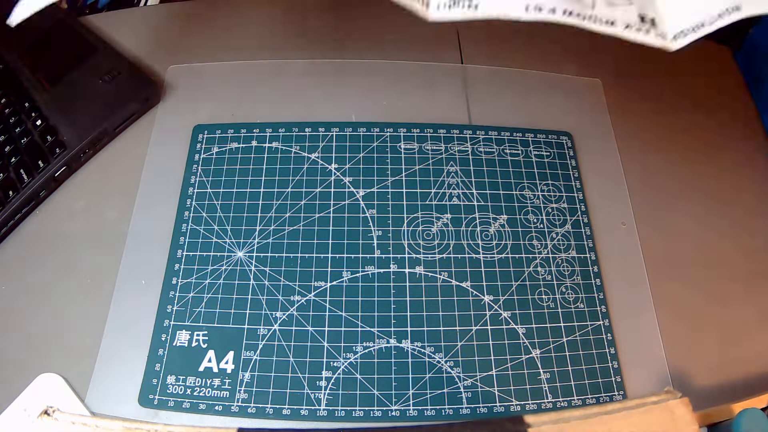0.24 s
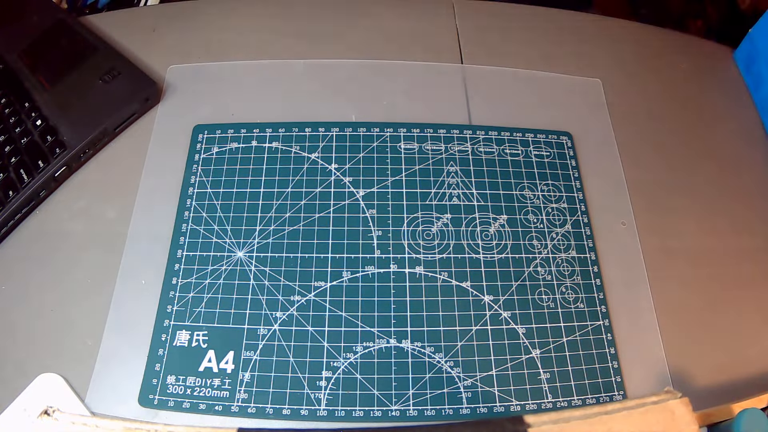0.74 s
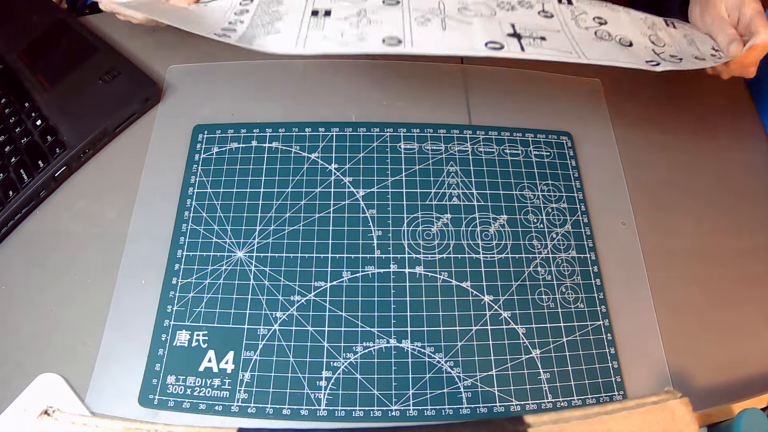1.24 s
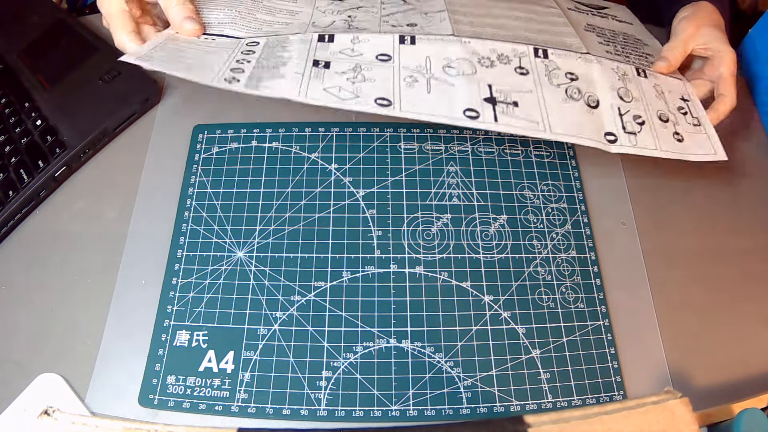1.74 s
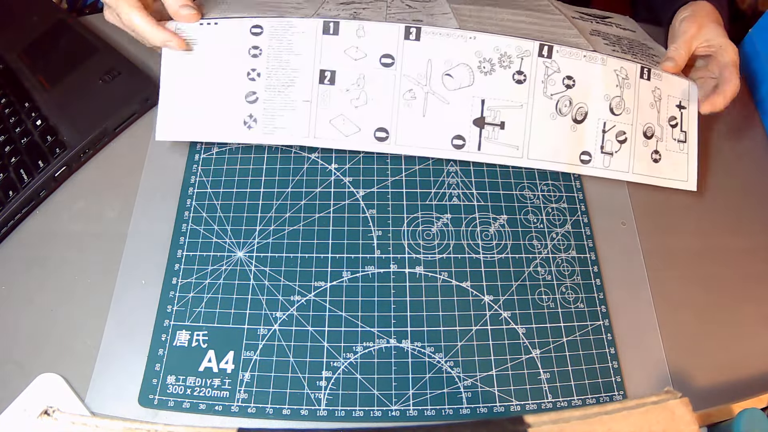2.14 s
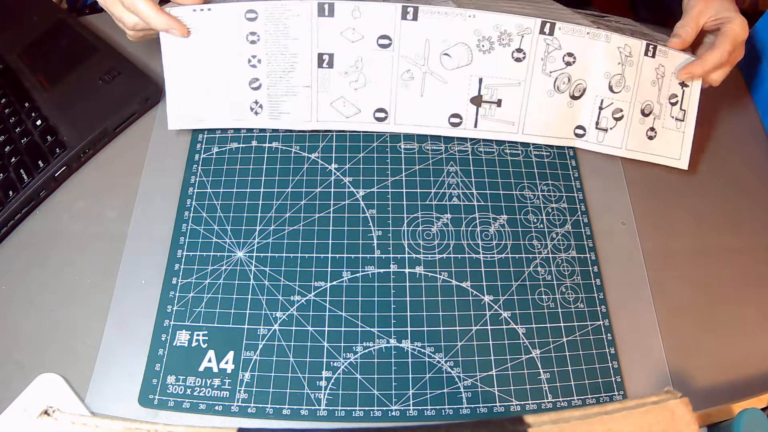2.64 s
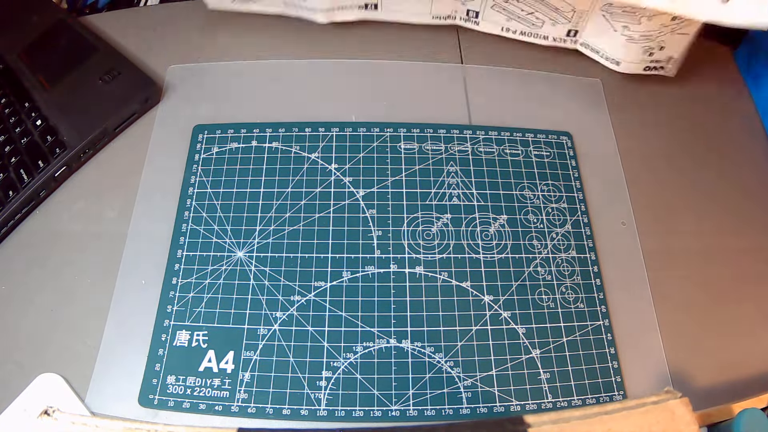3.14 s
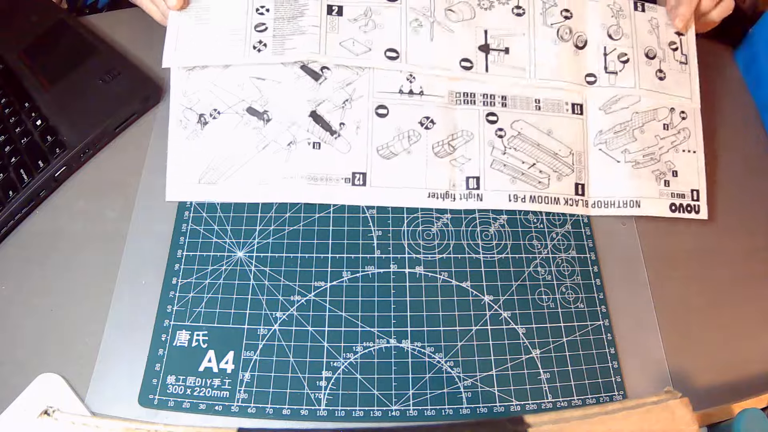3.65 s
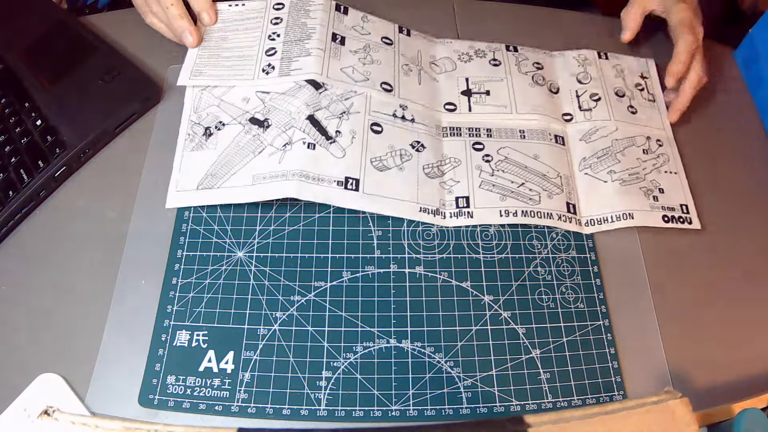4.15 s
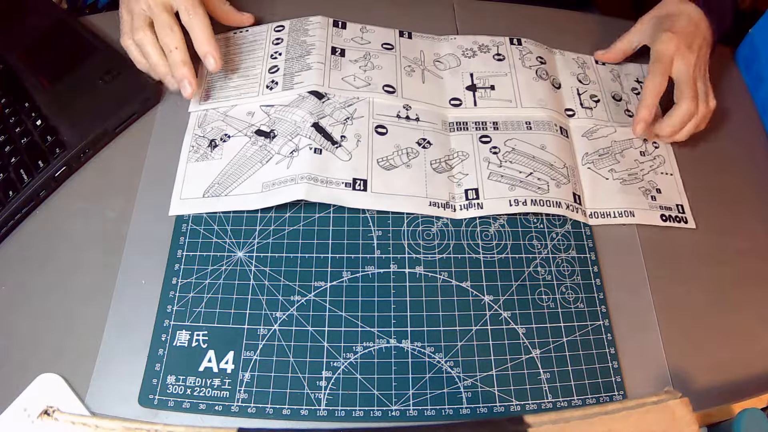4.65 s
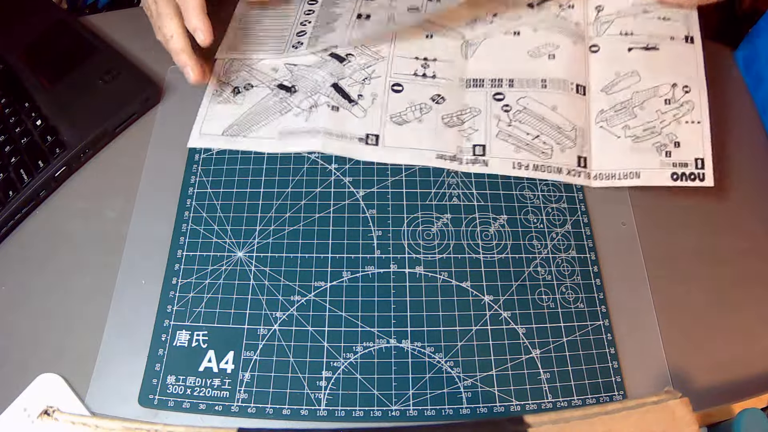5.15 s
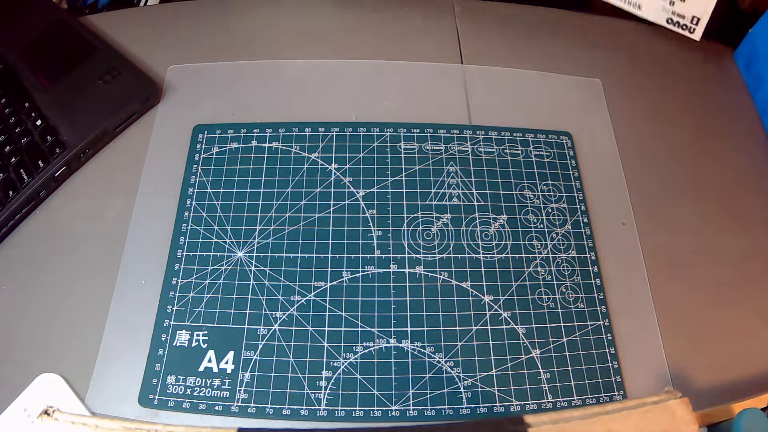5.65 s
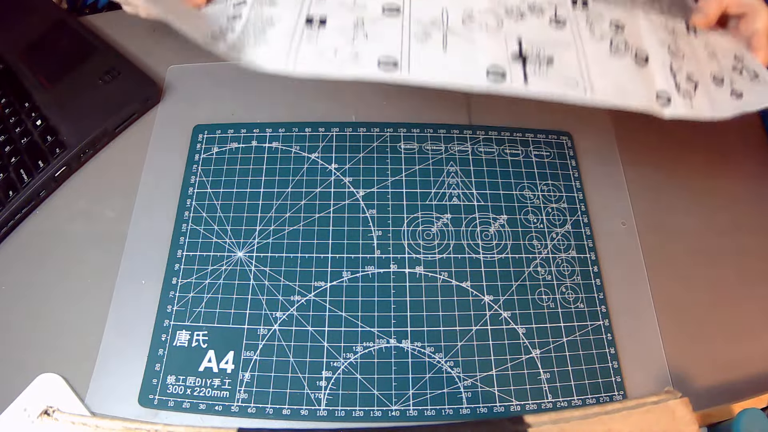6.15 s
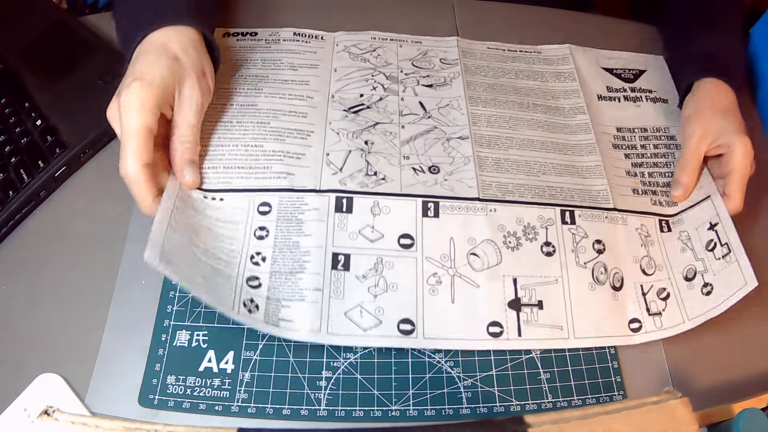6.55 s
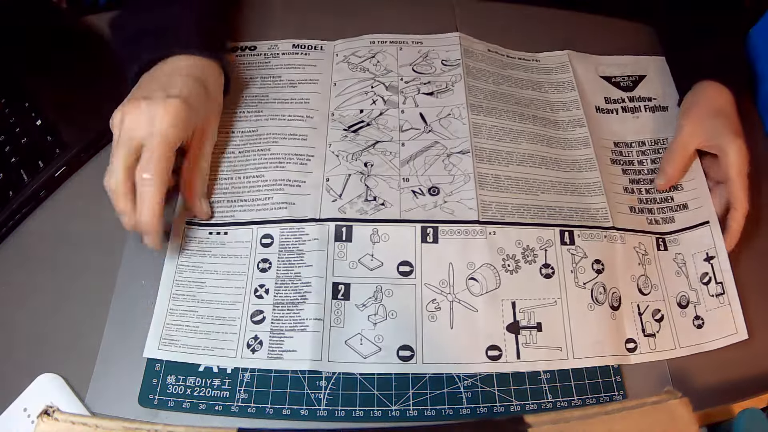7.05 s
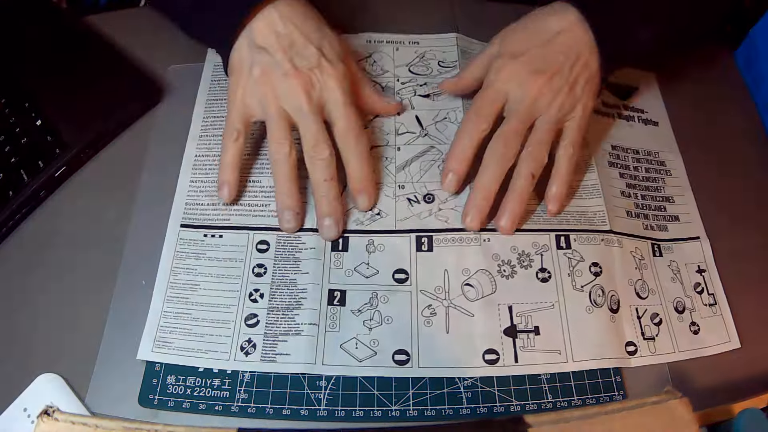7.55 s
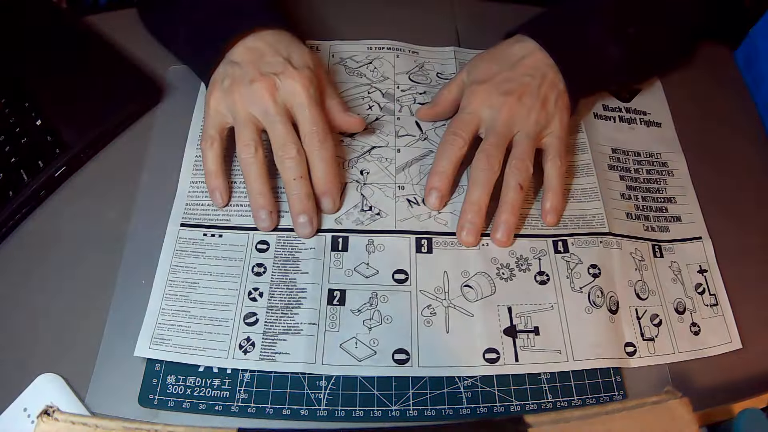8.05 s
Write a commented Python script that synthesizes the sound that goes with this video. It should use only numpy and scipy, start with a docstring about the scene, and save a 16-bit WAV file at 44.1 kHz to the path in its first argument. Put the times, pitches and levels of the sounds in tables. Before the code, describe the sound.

A large folded paper sheet rustles, snaps and pops loudly as it is turned and opened, then settles into soft smoothing strokes on a table.

```python
"""A large folded paper sheet is turned over, opened out and smoothed flat on a table in a small room.
Sliding paper and wrinkles are grains of filtered noise and single clicks that follow the hands' movements.
Panels buckle with dull pops and creases snap: dying bursts of random pushes, coloured and given a room tail.
Rubbing squeaks are gliding sine pairs; behind lie faint room noise, equipment tones and a low drone.
The colours are those of a desk microphone with a treble peak and little bass."""
import sys
import numpy as np
from scipy import signal
from scipy.fft import rfft, irfft, next_fast_len
from scipy.io import wavfile
from scipy.ndimage import uniform_filter1d, map_coordinates

SR = 44100
rng = np.random.default_rng(int(sys.argv[2]) if len(sys.argv) > 2 else 0)


def pcm_store(signal):
    """Save signal as 16-bit PCM."""
    levels = np.round(np.clip(np.atleast_2d(signal), -1, 1) * 32767)
    wavfile.write(sys.argv[1], SR, levels.astype(np.int16).T)


N = 365588
TOP_HZ = 15880  # upper band limit


def amp(db):
    """Decibels to gain."""
    return 10 ** (np.asarray(db) / 20)


def unit(x):
    """Scale to rms 1."""
    return x / np.sqrt(np.mean(x ** 2) + 1e-20)


def peak(x):
    """Scale to peak 1."""
    return x / np.max(abs(x))


def along(points, hz):
    """Read (frequency [Hz], value) points on a log frequency axis."""
    point_hz, values = np.transpose(points)
    return np.interp(np.log(hz + 1), np.log(point_hz), values)


def curves(rows):
    """One value per sample for each column after the time."""
    s, *columns = np.transpose(rows)
    return [np.interp(np.arange(N) / SR, s, column) for column in columns]


def add(track, s, x):
    """Mix x into the track at time s."""
    part = track[max(round(s * SR), 0):][:len(x)]
    part += x[:len(part)]


def wobble(rate):
    """A smooth random curve with the given number of knots a second."""
    knots = rng.standard_normal(int(N * rate / SR) + 4)
    return map_coordinates(knots, [np.arange(N) * rate / SR])


def coloured(x, colour_db, size=2048):
    """Causal, energy-neutral filter: the cepstrum is folded to give minimum phase."""
    level_db = colour_db(np.fft.rfftfreq(size, 1 / SR))
    cepstrum = irfft(np.log(amp(level_db) + 1e-6))
    cepstrum[1:size // 2] *= 2
    cepstrum[size // 2 + 1:] = 0
    pulse = irfft(np.exp(rfft(cepstrum)))
    return signal.fftconvolve(x, pulse / np.linalg.norm(pulse))[:len(x)]


def room(x, wet_db, build=0.00068, size=16384):
    """Direct sound plus a fresh diffuse tail, as the sheet never stays in one place; build in s."""
    # decay of the room: (frequency [Hz], t60 [s])
    room_decay = [(300, 0.14), (900, 0.26), (3000, 0.22), (11000, 0.15), (16000, 0.42)]
    hz, t, z = signal.stft(rng.standard_normal(size), SR, nperseg=256)
    decay = amp(-60 * t / along(room_decay, hz)[:, None])
    tail = signal.istft(z * decay, SR, nperseg=256)[1]
    tail *= 1 - np.exp(-np.arange(len(tail)) / SR / build)
    tail *= amp(wet_db) / np.linalg.norm(tail)
    tail[0] += 1  # the direct sound
    return signal.fftconvolve(x, tail)


def burst(t, t60):
    """A sudden release: pushes of random sign that die away exponentially."""
    return rng.choice([-1, 1], len(t)) * amp(-60 * t / t60)


def facets(depth_db, count=70):
    """Each bend divides the sheet into new facets with their own resonances: (Hz, dB)."""
    levels = depth_db * rng.uniform(-1.5, 1, count)
    return np.column_stack([np.geomspace(500, TOP_HZ, count), levels])


def patchy(x, depth_db, size=512):
    """Resonances come and go as the sheet changes its shape."""
    z = signal.stft(x, nperseg=size)[2]
    field = uniform_filter1d(rng.standard_normal(z.shape), size=3, axis=0)  # over frequency
    field = uniform_filter1d(field, size=7, axis=1)  # over time
    return unit(signal.istft(z * amp(depth_db * unit(field)), nperseg=size)[1][:N])


def slips_at_random(rate, spread_db):
    """Random moments, rate a second, each with a size of its own; zero elsewhere."""
    sizes = amp(spread_db * np.minimum(rng.standard_exponential(N), 3))
    return (rng.random(N) < rate / SR) * sizes


def rustle(colour, rate, spread_db, life, smooth):
    """Tiny slips of uneven size, each a puff dying over life [s], over a smooth share of friction."""
    slips = slips_at_random(rate, spread_db)
    power = signal.lfilter([1], [1, -np.exp(-1 / (life * SR))], slips ** 2)
    grain = np.sqrt(power / power.mean() + smooth) * rng.standard_normal(N)
    return unit(coloured(grain, lambda hz: along(colour, hz)))


def crackle(colour, rate, spread_db):
    """Single wrinkles flipping at random, each a click of its own size."""
    clicks = slips_at_random(rate, spread_db) * rng.choice([-1, 1], N)
    clicks = coloured(clicks, lambda hz: along(colour, hz))
    return unit(room(clicks, wet_db=2.5)[:N])


def swells(rows):
    """Gain over time of hand movements that each gather speed, crest and come to rest."""
    drop_db, shape = 15, 1.26  # fall in level at the ends of rise and fall; roundness of the top
    t, power = np.arange(N) / SR, np.full(N, 1e-10)
    for s, db, rise, fall in rows:
        away = np.maximum((s - t) / rise, (t - s) / fall)
        near = away < 3
        power[near] += amp(db - drop_db * away[near] ** shape) ** 2
    return np.sqrt(power)


def background():
    """Steady room noise with faint equipment tones whose phase wanders a little."""
    # spectrum of the room noise: (frequency [Hz], relative level [dB])
    air_colour = [(18, -88), (30, -53.5), (134, -53), (251, -8), (612, -3), (662, -18), (816, -11),
                  (1150, -7.5), (1840, -26), (2040, -17), (4980, -32), (7780, -24.5), (8420, -26),
                  (9110, -23), (15800, -49.5)]
    # equipment tones: (frequency [Hz], rms level [dB])
    whine = [(834, -85), (8226, -80)]
    air = unit(coloured(rng.standard_normal(N), lambda hz: along(air_colour, hz), size=8192))
    t = np.arange(N) / SR
    tones = np.zeros(N)
    for hz, db in whine:
        tones += amp(db) * np.sqrt(2) * np.sin(2 * np.pi * hz * t + 0.5 * wobble(15))
    return amp(-70.5) * air + tones


def drone():
    """The third and fourth harmonics of a low hum; the microphone loses those below."""
    # a faint hum that wavers, sags and fades out:
    # (time [s], fundamental [Hz], rms level of the fourth harmonic [dB])
    hum = [(0, 61.5, -97), (1.5, 64.4, -83), (2.1, 61.7, -84.5), (3.0, 61.3, -87), (3.65, 63.1, -81),
           (3.88, 61, -81), (4.05, 57, -110)]
    hz, db = curves(hum)
    phase = 2 * np.pi * np.cumsum(hz) / SR
    third, fourth = np.sin(3 * phase), np.sin(4 * phase)
    return np.sqrt(2) * amp(db) * (amp(-11) * third + fourth)


def squeaks(overtone=1.89, waver_hz=110, catch_t60=0.014):
    """A fingertip catches on the paper, then rubs on with an unsteady squeak and its overtone."""
    # dry rubs: (time [s], relative level [dB], starting pitch [Hz], rub re the catch [dB],
    # rub t60 [s], glide [octaves/s])
    rubs = [(2.43, -47, 2230, -10, 0.09, -1.4), (2.574, -50.5, 1828, -9, 0.67, -0.2),
            (4.529, -54.5, 2210, -5.5, 0.1, 0.8), (4.760, -47, 2170, -11, 0.12, -0.76),
            (7.728, -54.5, 2485, -9, 0.13, 1.7), (8.119, -48, 1843, -18.5, 2.2, 0.9)]
    out, t = np.zeros(N), np.arange(SR // 2) / SR
    for s, db, ring_hz, rub_db, t60, glide in rubs:
        hz = ring_hz * 2 ** (glide * t) + waver_hz * wobble(450)[:len(t)]
        phase = 2 * np.pi * np.cumsum(hz) / SR
        catch = amp(-60 * t / catch_t60)
        rub = amp(rub_db - 60 * t / t60 + 2.3 * wobble(90)[:len(t)])
        squeak = (catch + rub) * (np.sin(phase) + amp(-11.0) * np.sin(overtone * phase))
        # a small patch of paper radiates no bass
        squeak = coloured(squeak, lambda hz: along([(150, -30), (1200, -18)], hz))
        add(out, s, amp(db) * room(squeak, wet_db=5.5))
    return out


def snaps(chatter_db=-27, chatter_t60=0.25):
    """A stiff crease flips over suddenly, and the sheet around it chatters on."""
    # creases snapping over: (time [s], peak level before the room tail [dB], t60 [s])
    flips = [(0.0916, -18, 0.0077), (0.0937, -11.5, 0.01), (0.2852, -21, 0.057), (0.3181, -7, 0.0055),
             (0.383, -12.5, 0.011), (1.495, -40, .006), (1.7547, -41, .002), (2.132, -45, .004),
             (2.148, -35.5, 0.0077), (2.438, -29, 0.0063), (3.184, -28, 0.071), (4.723, -31.5, 0.0059),
             (5.1237, -7, 0.008), (5.788, -33, 0.069), (6.232, -22, 0.016), (6.4598, -28, 0.011),
             (6.860, -40, 0.0028), (7.069, -33.5, 0.027), (7.543, -40, 0.061)]
    # spectrum of a snap: (frequency [Hz], relative level [dB])
    crease_colour = [(30, -45.5), (200, -50), (500, -20.5), (1100, -11), (3000, -14.5), (5000, -10),
                     (6500, -6), (9000, -7.5), (10800, 3), (12000, -3.5), (13500, -26), (15800, -26)]
    out, t = np.zeros(N), np.arange(SR // 6) / SR
    for s, db, t60 in flips:
        ripple = facets(depth_db=4.5)
        drive = burst(t, t60) + amp(chatter_db) * burst(t, chatter_t60)
        crack = coloured(drive, lambda hz: along(crease_colour, hz) + along(ripple, hz))
        add(out, s, amp(db) * room(peak(crack), wet_db=-4.5))
    return out


def buckles(flexing, sheet_t60=0.14, spread=0.0019):
    """A panel pops through with a click; slower, lower bending waves then spread over the sheet."""
    # panels popping through: (time [s], relative click level [dB],
    # relative bending wave level [dB], brightness [dB])
    pops = [(0.077, -20, -41, -2.5), (0.259, -41, -45, 2), (0.283, -13, -31, 8.5), (0.319, -9, -35, 8.5),
            (0.473, -36, -48, -10), (0.571, -32.5, -52, -2), (0.584, -25.5, -48.5, 2),
            (0.689, -16, -41, 9.5), (0.751, -29.5, -52, -2), (0.792, -29, -45.5, 8), (0.83, -30, -46, 5.5),
            (1.045, -29, -54, 8), (1.158, -33, -46.5, -11), (1.225, -32, -46, 1), (1.258, -30, -44, 2.5),
            (1.297, -27, -42.5, 4), (1.403, -24.5, -41.5, 0.5), (1.494, -22.5, -43, 5),
            (1.525, -39, -40.5, 2), (1.754, -25, -46, 3), (1.818, -20.5, -40.5, 0.5),
            (1.902, -32, -40.5, -2), (2.013, -36, -48, -7), (2.131, -45, -52, -15),
            (2.304, -24.5, -44.5, -11.5), (2.424, -34, -58.5, 4), (2.47, -38.5, -48, -13),
            (2.901, -30, -47.5, 4), (2.991, -35, -50, 3), (3.097, -29, -50.5, -2), (3.184, -37, -45, 5),
            (3.523, -26.5, -47.5, -7.5), (3.587, -28.5, -51.5, 8), (3.733, -39.5, -60.5, -13.5),
            (3.914, -44.5, -58, -13), (4.113, -31.5, -48.5, 0), (4.406, -40, -69, 2),
            (4.761, -32.5, -51.5, 20), (4.882, -28, -49, 12), (5.1239, -19, -40.5, 13),
            (5.251, -28, -44, 1.5), (5.341, -24.5, -47, 3.5), (5.588, -24.5, -47.5, -1),
            (5.628, -25.5, -49.5, 11), (5.896, -26, -52, 6), (5.926, -29, -52, 5.5),
            (6.233, -15.5, -37, 1.5), (6.463, -17.5, -38.5, 12), (6.523, -29, -44.5, 8.5),
            (6.861, -24.5, -52, -0.5), (7.582, -39, -59.5, 0.5), (7.729, -39, -61, 0),
            (7.937, -43, -63, 1.5), (8.031, -37.5, -73, -8)]
    # spectrum of the click: (frequency [Hz], relative level [dB])
    click_colour = [(30, -37), (200, -61), (500, -16.5), (1100, -2.5), (2000, -2), (2700, 3), (3800, -6.5),
                    (5200, -16), (11000, -22.5), (15800, -40)]
    # spectrum of the bending waves: (frequency [Hz], relative level [dB])
    panel_colour = [(30, -47), (140, -41), (260, -35.5), (390, 3), (560, -7), (830, 5), (1400, -0.5),
                    (2000, 0), (2700, 1), (3800, -5.5), (5200, -18.5), (11000, -23), (15800, -54)]
    out, t = np.zeros(N), np.arange(SR // 5) / SR
    flex_db = 20 * np.log10(flexing)
    for s, click_db, waves_db, bright_db in pops:
        ripple = facets(depth_db=5)
        # deeper flexing gives a pop more low body
        body_db = -9 + 0.46 * (flex_db[round(s * SR)] - flex_db.mean())

        def tilt(hz):
            return bright_db * along([(1000, -0.68), (2200, 0.42)], hz) + along(ripple, hz)

        def waves_colour(hz):
            body = body_db * along([(250, 0.43), (400, 1), (700, 0.047)], hz)
            lower = along([(1000, 5.0), (5000, -6.5)], hz)
            return along(panel_colour, hz) + tilt(hz) + body + lower

        click = coloured(burst(t, t60=0.013), lambda hz: along(click_colour, hz) + tilt(hz))
        # neighbouring wrinkles give way in the wake of the pop
        aftershocks = 1 + 9 * (rng.random(len(t)) < 250 / SR)
        waves = aftershocks * burst(t, t60=sheet_t60) * (1 - np.exp(-t / spread))
        waves = coloured(waves, waves_colour)
        waves = waves / np.std(waves[:SR // 30])
        pop = amp(click_db - 4.0) * peak(click) + amp(waves_db - 1.0) * waves
        add(out, s, room(pop, wet_db=-7.0))
    return out


def handling(sliding, flexing):
    """Strokes hiss, flexing makes the wide panels flutter, and both set the wrinkles crinkling."""
    # spectrum of the sliding hiss: (frequency [Hz], relative level [dB])
    slide_colour = [(300, -56), (1500, -33), (4000, -12.5), (5500, -18), (6300, -15), (8800, -10),
                    (10000, -5), (11000, 1.5), (12000, -7.5), (13200, -15), (15800, -27.5)]
    # spectrum of crinkling wrinkles: (frequency [Hz], relative level [dB])
    crinkle_colour = [(200, -64), (700, -16), (1200, -0.5), (1900, -1.5), (2700, 3.5), (3800, -9),
                      (5200, -15), (9000, -15), (15800, -23.5)]
    # spectrum of fluttering panels: (frequency [Hz], relative level [dB])
    flutter_colour = [(100, -47.5), (220, -45), (310, -14), (390, 3.5), (550, -4.5), (800, 6.5), (1100, -7),
                      (1700, -14.5), (4000, -50.5)]
    # the sheet comes to lie on the table at 6.6 s; strokes crinkle a lying sheet 2.5 dB less
    lying = np.arange(N) / SR > 6.6
    crinkling = np.hypot(amp(-10.5 - 2.5 * lying) * sliding, amp(-3.5) * flexing)

    slide = patchy(rustle(slide_colour, rate=900, spread_db=5.0, life=0.0044, smooth=1.7), depth_db=3.5)
    slide += amp(-18) * crackle(slide_colour, rate=230, spread_db=6.5)
    crinkle = rustle(crinkle_colour, rate=240, spread_db=9.5, life=0.0068, smooth=1.0)
    crinkle = amp(-1) * patchy(crinkle, depth_db=6.0)
    crinkle += amp(-4) * crackle(crinkle_colour, rate=100, spread_db=7)
    flutter = patchy(rustle(flutter_colour, rate=130, spread_db=4, life=0.013, smooth=0.53), depth_db=2.5)

    uneven = amp(-0.4 + 2.3 * wobble(45))  # the hiss flickers in level
    return sliding * uneven * slide + crinkling * crinkle + flexing * amp(0.5) * flutter


def scene():
    """The sheet and the room at one microphone."""
    # paper sliding over paper, table and skin:
    # (fastest moment [s], relative hiss level [dB], rise [s], fall [s])
    strokes = [(0.05, -40.5, 0.27, 0.18), (0.25, -41.5, 0.16, 0.3), (0.42, -38.5, 0.12, .06),
               (0.565, -39, 0.14, 0.17), (0.98, -37.5, 0.048, 0.085), (1.13, -44, 0.12, 0.071),
               (1.265, -41.5, 0.07, 0.046), (1.495, -45, 0.12, 0.061), (1.65, -49.5, 0.096, 0.054),
               (1.775, -53, 0.052, 0.14), (1.945, -53, .045, 0.054), (2.148, -54, .015, .03),
               (2.25, -56, 0.049, 0.14), (2.41, -52, 0.13, 0.16), (3.08, -34.5, 0.13, 0.085),
               (3.19, -40, .07, 0.06), (3.35, -56.5, 0.09, 0.062), (3.44, -49, .05, 0.041),
               (3.61, -59, .04, 0.18), (3.92, -64, 0.11, 0.2), (4.12, -55, .06, .14),
               (4.42, -59.5, .06, .08), (4.54, -60, 0.1, 0.11), (4.73, -48, 0.056, .08),
               (4.875, -40, 0.059, 0.11), (4.99, -48.5, 0.17, 0.11), (5.16, -45, 0.042, 0.088),
               (5.28, -45, 0.17, 0.11), (5.485, -35, 0.047, 0.039), (5.59, -42, 0.14, 0.07),
               (5.8, -52.5, 0.2, 0.078), (6.03, -62, .15, 0.087), (6.25, -45, 0.05, 0.12),
               (6.41, -50.5, 0.42, 0.1), (6.53, -46.5, 0.045, 0.055), (6.66, -46, 0.084, 0.097),
               (6.8, -55.5, .06, 0.3), (6.94, -48.5, 0.073, 0.16), (7.075, -41, 0.038, 0.025),
               (7.18, -57, 0.11, 0.1), (7.575, -42.5, 0.014, 0.1), (7.92, -62, 0.5, 0.14),
               (8.055, -51, 0.048, 0.055), (8.24, -64.5, 0.29, .2)]
    # the sheet sways and bends in the hands:
    # (deepest moment [s], relative flutter level [dB], rise [s], fall [s])
    flexes = [(0.0, -47.5, .05, .05), (0.105, -45.5, 0.034, 0.12), (0.32, -38, 0.053, 0.077),
              (0.585, -45, .1, 0.076), (0.78, -49.5, 0.19, .11), (1.05, -54, 0.088, 0.26),
              (1.24, -58, .1, 0.17), (1.53, -54.5, 0.28, 0.14), (1.82, -55.5, 0.29, 0.091),
              (1.93, -53.5, .06, .1), (2.36, -63.5, 0.24, 0.57), (3.08, -53.5, 0.17, 0.093),
              (3.21, -51.5, 0.026, 0.089), (3.56, -57, 0.077, 0.15), (4.1, -63, 0.42, 0.44),
              (4.65, -67.5, 0.59, .3), (5.09, -58, .15, 0.19), (5.28, -46, 0.047, 0.089),
              (5.375, -48.5, 0.051, 0.035), (5.5, -46, 0.048, 0.17), (5.61, -45, 0.054, 0.081),
              (5.915, -49.5, 0.066, .07), (6.27, -59, 0.26, 0.15), (6.45, -58.5, 0.37, 0.51),
              (6.98, -62.5, .2, 0.35), (7.61, -68, 0.045, 0.19), (8.15, -67.5, 0.98, 0.48)]
    sliding, flexing = swells(strokes), swells(flexes)
    surroundings = background() + drone()
    sheet = squeaks() + snaps() + buckles(flexing) + handling(sliding, flexing)
    return (surroundings + sheet)[None]


def record(dry):
    """The recorder keeps nothing above its band limit."""
    m = next_fast_len(N + SR // 2)
    kept = np.fft.rfftfreq(m, 1 / SR) < TOP_HZ
    return irfft(rfft(dry, m) * kept, m)[..., :N]


dry = scene()
out = record(dry)
pcm_store(out)
```